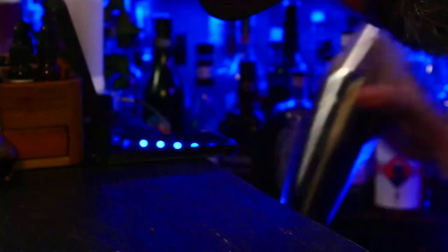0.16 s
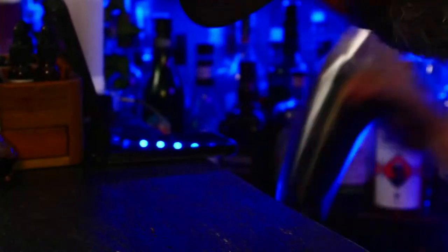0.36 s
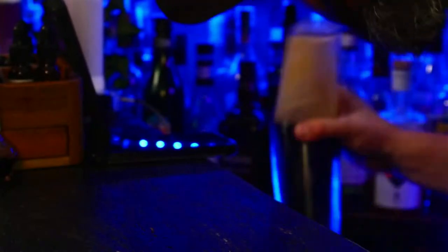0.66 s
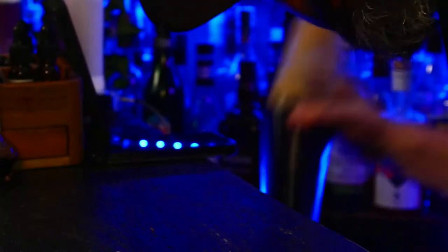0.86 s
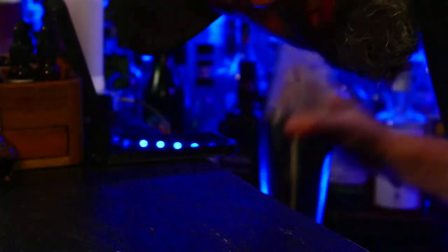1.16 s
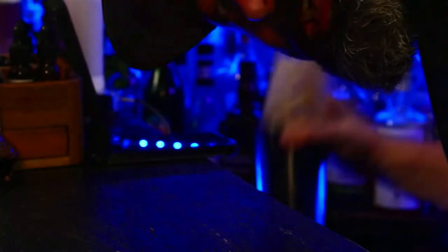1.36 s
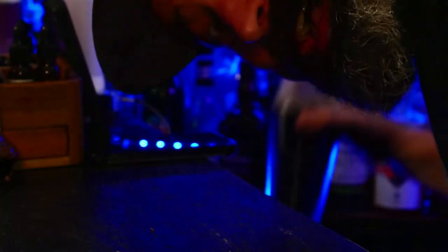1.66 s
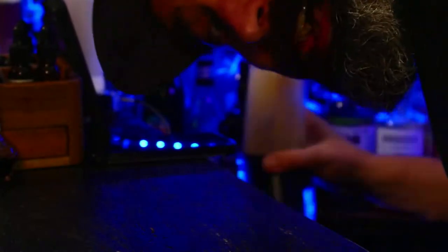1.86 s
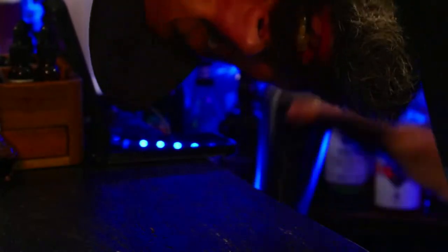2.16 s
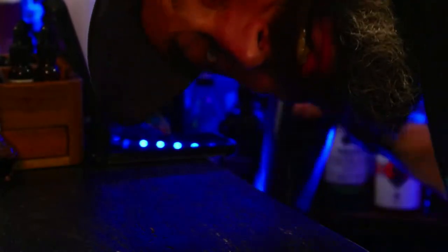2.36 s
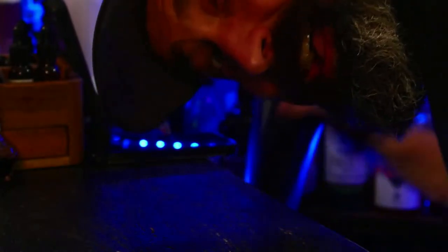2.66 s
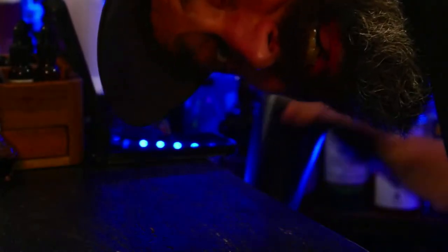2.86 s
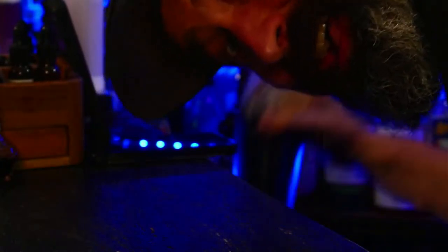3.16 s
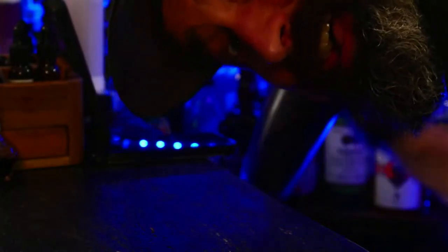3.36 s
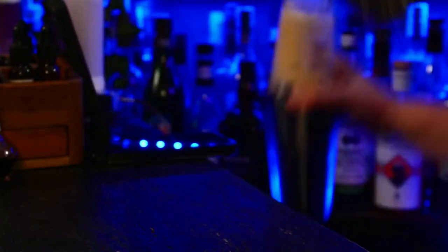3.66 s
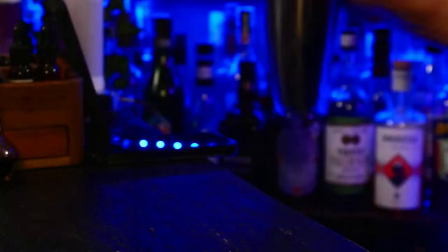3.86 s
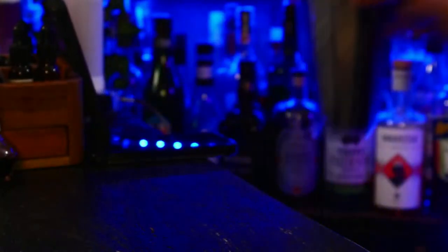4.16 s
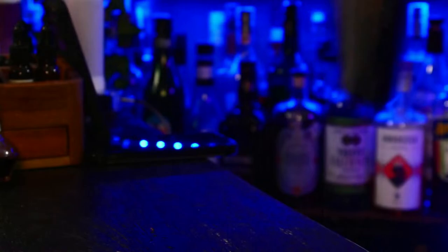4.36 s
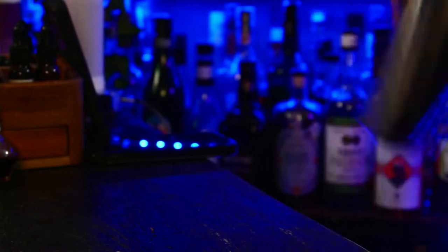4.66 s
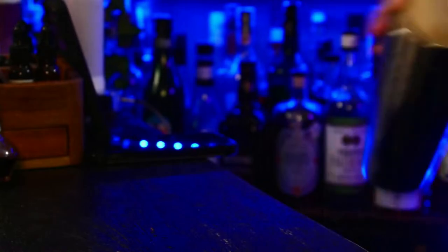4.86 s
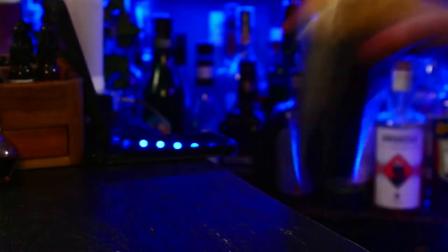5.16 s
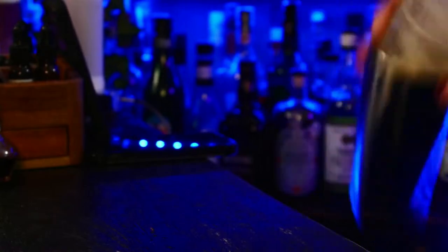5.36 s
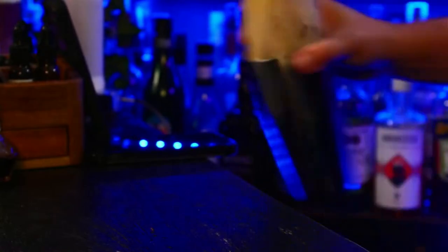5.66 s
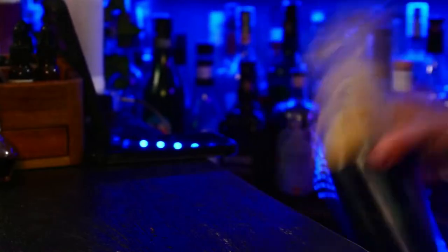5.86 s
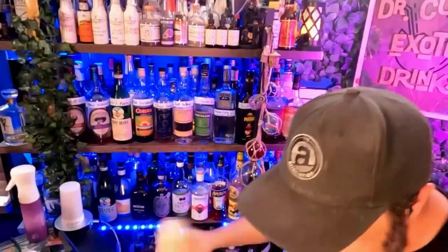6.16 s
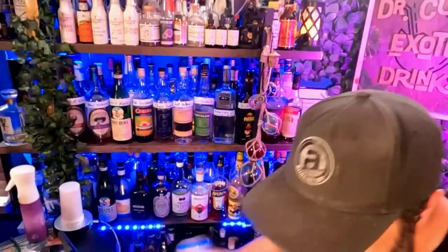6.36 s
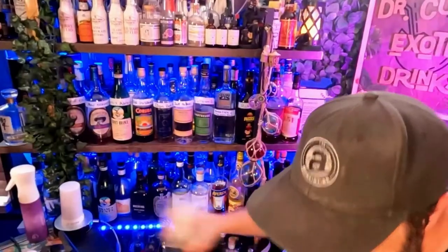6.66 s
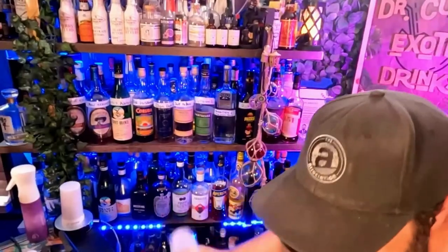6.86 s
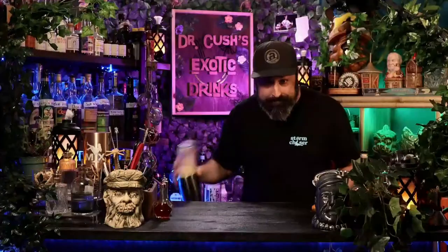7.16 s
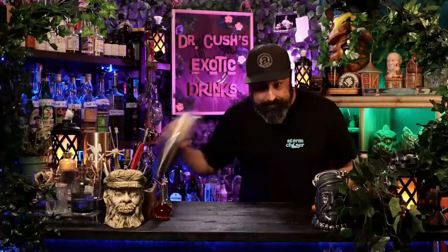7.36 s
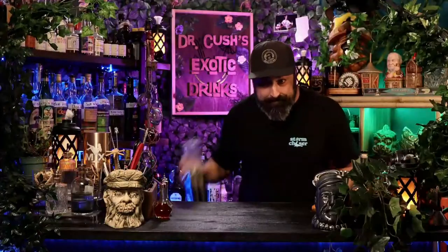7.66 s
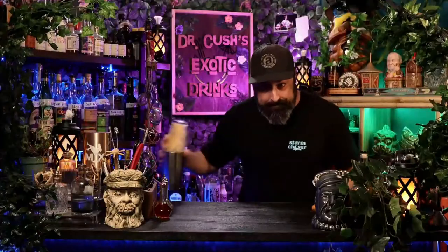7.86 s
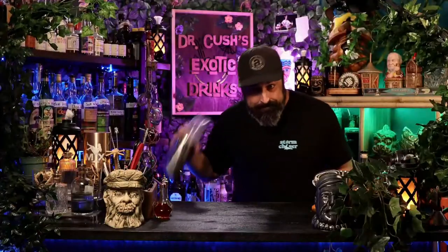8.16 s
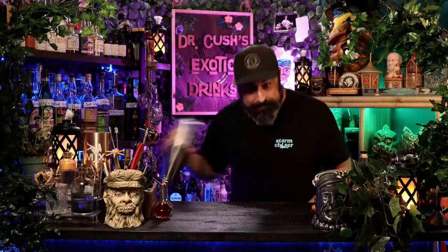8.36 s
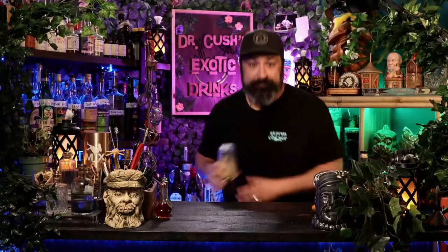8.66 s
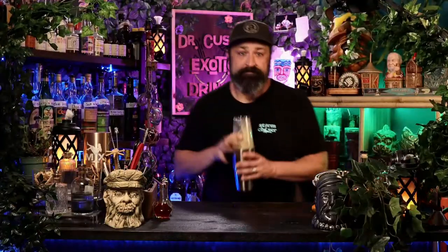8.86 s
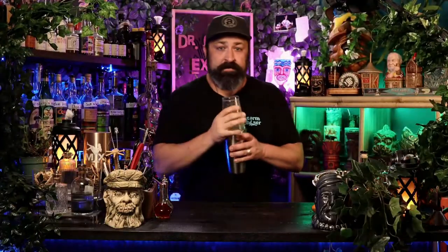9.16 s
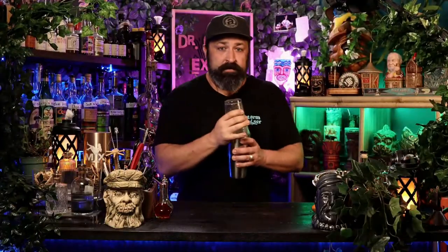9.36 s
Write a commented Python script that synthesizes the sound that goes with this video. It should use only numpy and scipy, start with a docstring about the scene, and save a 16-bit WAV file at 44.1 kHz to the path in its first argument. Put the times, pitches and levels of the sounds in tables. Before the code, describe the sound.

A cocktail shaker full of ice is shaken in a small room, crunchy metallic knocks getting louder until they stop and a palm smacks the tin.

```python
"""A small cluttered bar room: ice cubes are thrown up and down in a hand-held steel and glass cocktail shaker.
Each knock is a lead cube and a swarm of followers, noise bursts ringing the hand-damped walls.
The moving drink gulps in sagging sine tones; a palm slap, a filtered noise burst, comes near the end.
Dense echoes surround it all, and a noise suppressor pulls the tails into near silence between strokes."""
import sys
import numpy as np
from scipy import signal
from scipy.fft import rfft, irfft
from scipy.io import wavfile
from scipy.ndimage import uniform_filter1d

SR = 44100
rng = np.random.default_rng(int(sys.argv[2]) if len(sys.argv) > 2 else 0)


def volts_from_decibels(level):
    """Turn decibel levels (scalar or array-like) into linear amplitude factors."""
    exponent = np.asarray(level, float) / 20
    return 10 ** exponent


def wav_out(sig):
    """Save sig, one row per channel (or a flat mono array), as 16-bit PCM at SR to the path in sys.argv[1]."""
    wavfile.write(sys.argv[1], SR, np.round(np.clip(np.atleast_2d(sig).T, -1, 1) * 32767).astype(np.int16))


N = 419391
BLOCK = 8192  # samples in one knock
LEAD_IN_S = .003  # time in a knock before its lead blow


def room(x, low_t60_s=0.33, high_t60_s=0.28, split_hz=330.0, gap_s=0.008, wet_db=-16.0):
    """Diffuse reverberation: dense echoes decay exponentially, the treble dying first."""
    t = np.arange(2 * BLOCK) / SR
    noise = rng.standard_normal(2 * BLOCK) * (1 - np.exp(-(t / gap_s) ** 2))
    low = signal.sosfilt(signal.butter(1, split_hz, fs=SR, output="sos"), noise)
    echo = low * volts_from_decibels(-60 * t / low_t60_s) + (noise - low) * volts_from_decibels(-60 * t / high_t60_s)
    echo = echo / np.sqrt(np.sum(echo ** 2))
    return x + volts_from_decibels(wet_db) * signal.fftconvolve(x, echo)[:N]


def gulps(rise_s=0.0025, sag_per_s=0.69, rough=.5, longest_s=.4):
    """Cavity resonance: the drink slops over and the air above it hums, sagging in pitch."""
    # hums, before rise and roughness: start_s, level_db, starting pitch_hz, decay_s
    hums = [(.185, -44.5, 622, 0.042), (4.44, -42.5, 334, 0.0056), (4.795, -46, 565, 0.018),
            (5.112, -31.5, 276, 0.022), (6.045, -41.5, 519, 0.052), (6.272, -29.5, 565, 0.012),
            (6.918, -26, 560, 0.016), (6.962, -34.5, 560, 0.014), (7.468, -23.5, 581, 0.0073),
            (8.722, -24, 609, 0.0077)]
    out = 0
    wobble = uniform_filter1d(rng.standard_normal(N), size=200) * np.sqrt(200)
    for start_s, level_db, pitch_hz, decay_s in hums:
        t = np.clip(np.arange(N) / SR - start_s, 0, longest_s)
        tone = np.sin(2 * np.pi * pitch_hz * (t - sag_per_s * t ** 2 / 2))
        envelope = (1 - np.exp(-t / rise_s)) * np.exp(-t / decay_s) * (t < longest_s)
        out = out + volts_from_decibels(level_db) * tone * envelope
    return out * (1 + rough * wobble)


def slap(lead_s=0.0011, tail_s=0.024, tail_db=-9.5, low_hz=280.0, high_hz=9200.0, dull_hz=5200.0):
    """Impact noise: a palm hits the tin to break the seal, a bright smack and a short, duller rattle."""
    # the slap: start_s, peak_db
    start_s, peak_db = (9.1922, -8)
    t = np.clip(np.arange(N) / SR - start_s, 0, None)
    noise = rng.standard_normal(N)
    rattle = signal.sosfilt(signal.butter(1, dull_hz, fs=SR, output="sos"), noise)
    smack = noise * np.exp(-t / lead_s) + volts_from_decibels(tail_db) * rattle * np.exp(-t / tail_s)
    smack = smack * (t > 0)
    smack = signal.sosfilt(signal.butter(1, [low_hz, high_hz], "bandpass", fs=SR, output="sos"), smack)
    return volts_from_decibels(peak_db) * smack / np.abs(smack).max()


def swarm(decay_s, lead_db, rise_s, rate_hz=420., scatter_db=8.0, slosh_db=-7.0, tap_s=0.0013, lead_s=0.00054):
    """Random impact excitation: ice slides in, a lead blow lands, smaller taps and slush die away together."""
    t = np.arange(BLOCK) / SR
    chance = rng.standard_normal((len(decay_s), 2, BLOCK))
    taps = rng.random((len(decay_s), BLOCK)) < rate_hz / SR
    taps = taps * volts_from_decibels(scatter_db * np.tanh(chance[:, 0]))
    taps = signal.lfilter([1], [1, -np.exp(-1 / (tap_s * SR))], taps)
    rise = 1 - np.exp(-(t / rise_s[:, None]) ** 2)
    fade = rise * np.exp(-t / np.clip(decay_s, .003, .07)[:, None])
    after = t - LEAD_IN_S
    lead = volts_from_decibels(lead_db)[:, None] * (after >= 0) * np.exp(-np.abs(after) / lead_s)
    return chance[:, 1] * ((taps + volts_from_decibels(slosh_db)) * fade + lead)


def damped_mode(hz, mode_hz, t60_s):
    """Damped harmonic oscillator: its resonance is the broader the faster it decays."""
    width_hz = np.log(1000) / (np.pi * t60_s)
    scale = np.sqrt(width_hz * mode_hz) * mode_hz
    return scale / (mode_hz ** 2 - hz ** 2 + 1j * hz * width_hz)


def small_modes(hz, count, depth_db=3.3):
    """Causal filter from a folded cepstrum: small wall modes that a blow happens to wake ring on after it."""
    heights = np.tanh(rng.standard_normal((count, 256)))
    ripple = np.array([np.interp(hz, np.arange(256) * 90., row) for row in heights])
    cepstrum = irfft(np.log(volts_from_decibels(depth_db)) * ripple)
    cepstrum[:, BLOCK // 2:] = 0
    return np.exp(2 * rfft(cepstrum))


def body(hz, hollow_hz, hollow_db=-5.5, hollow_t60_s=0.04, share_db=-16.0, lumps_db=4.0, lump_octaves=0.2497):
    """Modal superposition: bare crack plus air and wall modes, struck at a new spot every time."""
    # walls damped by hands and drink: mean pitch_hz, relative level_db, t60_s
    walls = [(274.5, 8, 0.25), (560, 2.5, 0.25), (2287, 5, 0.048), (3364, 8, 0.014), (4296, -5, 0.0052),
             (5047, 7.5, 0.0077), (6795, 5, 0.004)]
    # spectrum of the bare crack of ice on metal: pitch_hz, level_db (per Hz)
    bare_crack = [(60, -25), (256, -12), (950, -3), (1420, -8), (1900, -4), (4420, -2.5), (7400, -12.5),
                  (10000, -19.5), (12700, -29), (16000, -36)]
    count = len(hollow_hz)
    # the air left over the drink changes its pitch as the load moves
    response = 1 + volts_from_decibels(hollow_db) * damped_mode(hz, hollow_hz[:, None], hollow_t60_s)
    scatter_db, detune_share = 5.5, .05
    for wall_hz, level_db, t60_s in walls:
        chance = rng.standard_normal((count, 2)).T[:, :, None]
        mode_hz = wall_hz * (1 + detune_share * chance[0])  # grip and drink detune the walls
        gain = volts_from_decibels(level_db + share_db + scatter_db * np.tanh(chance[1]))
        response = response + gain * damped_mode(hz, mode_hz, t60_s)
    # every cube has its own shape, so its own humps and dips
    place = np.log2(1 + hz / 100) / lump_octaves
    lumps = rng.standard_normal((count, 128))
    lumps = np.array([np.interp(place, np.arange(128), row) for row in lumps])
    response = response * small_modes(hz, count)
    crack_hz, crack_db = np.array(bare_crack).T
    return response * volts_from_decibels(np.interp(np.log(hz), np.log(crack_hz), crack_db) + lumps_db * lumps)


def tin_ring(hz, count, scatter_share=.025):
    """Split modal pair: two close resonances of the steel cup beat together."""
    # strongest ring of the cup: mean pitch_hz, t60_s, half_spacing (share of the pitch)
    mean_hz, t60_s, half_spacing = (1760, 0.051, 0.027)
    tin_hz = mean_hz * (1 + scatter_share * rng.standard_normal((count, 1)))  # the grip detunes the cup
    pair = sum(damped_mode(hz, tin_hz * (1 + side * half_spacing), t60_s) for side in (-1, 1))
    # so small a wall radiates little below its ring
    return pair * (hz / tin_hz).clip(0, 1) ** 2


def cube_shares(hz, count):
    """Incoherent sources: dull, middling and bright cubes tap at different moments, each in its own band."""
    def below(edge_hz):
        scattered_hz = edge_hz * 2 ** (.2 * rng.standard_normal((count, 1)))
        return 1 / (1 + (hz / scattered_hz) ** 8)
    dull, middling = below(2700), below(3900)
    return dull, (1 - dull) * middling, (1 - dull) * (1 - middling)


def hollow_pitch(weight_db, usual_thud_db=-19, middle_hz=680, octaves_per_db=-.035, scatter_octaves=.2):
    """Load-dependent resonance: a load on the cushioned base thuds low, cubes on the bare wall sound higher."""
    heavy_db = (weight_db - usual_thud_db).clip(-16, 14)
    octaves = octaves_per_db * heavy_db + scatter_octaves * rng.standard_normal(len(weight_db))
    return (middle_hz * 2 ** octaves).clip(250, 1250)


def ring_levels(blow_s, crack_db, usual_db=-21, scatter_db=5.5):
    """Variable modal coupling: the cup rings by chance, or as listed when a throw catches bare steel."""
    # throws that set the cup ringing, each given to the nearest knock: time_s, peak_db
    clangs = [(0.3564, -33.5), (0.5791, -25), (0.6295, -24.5), (1.2516, -25), (1.3623, -28),
              (1.9724, -25.5), (2.6439, -25.5), (3.3234, -23.5), (3.5174, -29), (3.9928, -13.5),
              (4.2018, -20), (4.3824, -22), (4.4179, -17.5), (5.2904, -22), (5.7793, -24.5), (6.2687, -29),
              (7.1252, -29), (8.4088, -19), (9.1167, -47)]
    ring_db = crack_db + usual_db + scatter_db * rng.standard_normal(len(blow_s))
    for time_s, peak_db in clangs:
        ring_db[np.abs(blow_s - time_s).argmin()] = peak_db
    return ring_db


def shaker(window_s=0.0063, lead_db=17.5, harder=0.5, rise_s=0.00093, softer=0.34):
    """Source-filter principle: swarms of ice drive thud, tin ring, crack and sparkle at their own strengths."""
    # knocks: blow_s, crack_peak_db, thud_over_crack_db, base decay_s of the swarm
    knock_list = [(0.0014, -24.5, -10.5, 0.017), (0.138, -49.5, -19, 0.081), (0.1692, -26, -18, 0.028),
                  (0.3032, -43.5, -17, 0.029), (0.359, -32, -21, 0.032), (0.432, -39, -10, 0.044),
                  (0.4594, -23, -15, 0.027), (0.5438, -38, -50, 0.084), (0.5792, -17, -34, 0.024),
                  (0.632, -20, -35, 0.044), (0.6739, -30, -23.5, 0.011), (0.6863, -27.5, -6, 0.016),
                  (0.802, -42.5, -23.5, 0.019), (0.83, -33, -38, 0.027), (0.8787, -25.5, -25, 0.047),
                  (0.9109, -20, -21, 0.033), (1.071, -41.5, -19, 0.091), (1.127, -28.5, -5.5, 0.023),
                  (1.2248, -21.5, -46, 0.031), (1.2492, -19.5, -26, 0.026), (1.2891, -21, -29.5, 0.055),
                  (1.325, -28.5, -19.5, 0.024), (1.3614, -16.5, -18.5, 0.027), (1.545, -36, -22, 0.038),
                  (1.5833, -21, -24, 0.025), (1.7698, -43, -19, 0.081), (1.8137, -23, -19.5, 0.017),
                  (1.926, -32.5, -32.5, 0.026), (1.9717, -22, -29.5, 0.034), (2.03, -27.5, -17, 0.018),
                  (2.0658, -9, -27, 0.035), (2.2418, -28.5, -25, 0.016), (2.2678, -20, -24, 0.022),
                  (2.4419, -39.5, -17, 0.089), (2.4888, -25, -15, 0.04), (2.615, -31.5, -34, 0.057),
                  (2.6435, -21, -31, 0.046), (2.7358, -28, -25, 0.008), (2.7505, -17.5, -18, 0.021),
                  (2.7633, -24.5, -13, 0.012), (2.813, -36.5, -4, 0.013), (2.912, -32, -16.5, 0.056),
                  (2.9448, -19.5, -18, 0.017), (3.046, -35.5, -25, 0.027), (3.085, -28, -30, 0.028),
                  (3.0983, -22, -23, 0.013), (3.12, -22, -23.5, 0.028), (3.1697, -21.5, -17, 0.014),
                  (3.181, -24, -9, 0.014), (3.2772, -20, -40, 0.027), (3.3127, -25.5, -30, 0.011),
                  (3.3244, -13.5, -29, 0.013), (3.351, -13, -32, 0.025), (3.4102, -16, -20, 0.024),
                  (3.5186, -19, -25, 0.049), (3.569, -14.5, -21, 0.059), (3.6397, -20, -17, 0.014),
                  (3.81, -18.5, -20.5, 0.049), (3.8206, -12.5, -18.5, 0.031), (3.933, -27.5, -18.5, 0.019),
                  (3.9925, -11, -33.5, 0.027), (4.1102, -15, -15.5, 0.025), (4.142, -20.5, -17, 0.0094),
                  (4.2017, -16, -28.5, 0.0091), (4.235, -17, -22.5, 0.012), (4.249, -17.5, -21, 0.0083),
                  (4.274, -18.5, -14.5, 0.026), (4.288, -16.5, -22, 0.011), (4.3222, -21.5, -18, 0.0082),
                  (4.3813, -14, -18.5, 0.0054), (4.4168, -12.5, -22.5, 0.022), (4.46, -27.5, -20, 0.02),
                  (4.546, -6.5, -21.5, 0.031), (4.5753, -20.5, -14.5, 0.004), (4.6113, -14, -17, 0.02),
                  (4.6839, -26.5, -9, 0.032), (4.848, -21.5, -21.5, 0.0061), (4.8775, 2.5, -39, 0.04),
                  (5.007, -18, -17, 0.021), (5.073, -19, -20, 0.053), (5.107, -30.5, -10.5, 0.018),
                  (5.1502, -25.5, -16, 0.007), (5.2926, -35, -18.5, 0.036), (5.3044, -25.5, -29, 0.0084),
                  (5.3143, -10.5, -30.5, 0.028), (5.446, -6, -26, 0.024), (5.5036, -21.5, -24, 0.038),
                  (5.5572, -19, -19.5, 0.035), (5.603, -16.5, -15.5, 0.041), (5.7798, -27, -23, 0.041),
                  (5.81, -23.5, -22, 0.026), (5.88, -5, -26, 0.019), (5.9891, -27, -20.5, 0.018),
                  (6.0362, -26.5, -11.5, 0.042), (6.098, -22, -24.5, 0.026), (6.132, -20.5, -22.5, 0.03),
                  (6.196, -14.5, -22.5, 0.0163), (6.2115, -18.5, -19.5, 0.034), (6.2694, -18, -20, 0.016),
                  (6.3079, -4.5, -25, 0.026), (6.395, -23.5, -19.5, 0.029), (6.4517, -24, -10.5, 0.041),
                  (6.555, -30, -16, 0.031), (6.6084, -23, -14.5, 0.019), (6.6603, -27.5, -14, 0.016),
                  (6.7539, -15.5, -24, 0.026), (6.896, -39, -21.5, 0.073), (6.9274, -20, -29, 0.023),
                  (7.0345, -20.5, -17.5, 0.025), (7.07, -28, -39, 0.023), (7.124, -34, -31, 0.02),
                  (7.2, -8.5, -24, 0.022), (7.3331, -24.5, -21.5, 0.058), (7.37, -20.5, -16.5, 0.0073),
                  (7.47, -23, -14, 0.009), (7.539, -31.5, -23, 0.037), (7.618, -14, -23, 0.025),
                  (7.688, -30, -20.5, 0.023), (7.7499, -24, -16, 0.039), (7.788, -20.5, -19.5, 0.013),
                  (7.9239, -19, -37, 0.017), (7.9506, -15.5, -29.5, 0.027), (7.9697, -19, -27.5, 0.015),
                  (8.077, -17, -25, 0.029), (8.213, -16.5, -22, 0.031), (8.2473, -17, -18, 0.008),
                  (8.2581, -18.5, -21.5, 0.015), (8.3566, -23.5, -41.5, 0.032), (8.3755, -22, -29.5, 0.014),
                  (8.4092, -16, -23.5, 0.024), (8.4189, -18.5, -37.5, 0.041), (8.532, -4, -26.5, 0.00575),
                  (8.537, -10.5, -18, 0.017), (8.5675, -20, -14.5, 0.028), (8.616, -26.5, -14, 0.051),
                  (8.7203, -23.5, -14, 0.022), (8.8726, -23, -19, 0.047), (8.9673, -41.5, -10.5, 0.016),
                  (9.1164, -57, -7, 0.034), (9.3874, -56, -7, 0.11), (9.5018, -33, -26, 0.013)]
    # treble as the shaker turns and moves: time_s, sparkle_over_crack_db,
    # crack_tilt_db_per_octave, sparkle_tilt_db_per_octave
    turns = [(0, -22, 2, -6.5), (2, -25.5, 4, -2), (3.8, -25.5, 2, 1.5), (4.499, -24, -3, 2.5),
             (5.5, -31, -1.5, 8.5), (6.3, -29, 0, 3), (7.3, -22.5, 0.5, 1), (8.501, -21, 1, 0)]
    # borders of thud, crack and sparkle: pitch_hz
    edges_hz = [1300, 7500]
    # swarms of thud, tin ring, crack, sparkle: decay_factor, rise_factor, added lead_blow_db
    parts = [(0.98, 1.63, -7), (1, 0.36, -2.5), (0.85, 0.65, 5), (1, 1.2, 8.5)]
    blow_s, crack_db, weight_db, decay_s = np.transpose(knock_list)
    count = len(blow_s)
    turn_s, *treble = np.transpose(turns)
    over_db, crack_tilt, sparkle_tilt = (np.interp(blow_s, turn_s, column) for column in treble)
    thud_db, sparkle_db = crack_db + weight_db, crack_db + over_db
    ring_db = ring_levels(blow_s, crack_db)

    hz = np.arange(BLOCK // 2 + 1) * SR / BLOCK + 1e-3
    response = body(hz, hollow_pitch(weight_db))
    low_hz, high_hz = edges_hz
    thud, crack, sparkle = (
        response * signal.sosfreqz(signal.butter(2, edge, kind, fs=SR, output="sos"), hz, fs=SR)[1]
        for edge, kind in [(low_hz, "lowpass"), (edges_hz, "bandpass"), (high_hz, "highpass")])
    crack = crack * volts_from_decibels(crack_tilt[:, None] * np.log2(hz.clip(low_hz, high_hz) / low_hz))
    sparkle = sparkle * volts_from_decibels(sparkle_tilt[:, None] * np.log2(hz.clip(high_hz) / high_hz))

    shapes = [thud, tin_ring(hz, count), crack, sparkle]
    levels = [thud_db, ring_db, crack_db, sparkle_db]
    by_peak = [False, True, True, False]  # the others are levelled by their early rms
    shares = cube_shares(hz, count)
    early = np.exp(-np.arange(BLOCK) / SR / window_s)
    # hard throws land as one lump, so they rise faster and their lead blow stands out more
    force_db = crack_db.clip(-36)
    knocks = 0
    for shape, level_db, peak, (longer, slower, blow_db) in zip(shapes, levels, by_peak, parts):
        part_lead_db = lead_db + blow_db + harder * force_db
        part_rise_s = slower * rise_s * volts_from_decibels(-softer * force_db)
        drive = sum(np.sqrt(share) * rfft(swarm(longer * decay_s, part_lead_db, part_rise_s))
                    for share in shares)
        band = irfft(shape * drive)
        size = np.abs(band).max(1) if peak else np.sqrt(band ** 2 @ early / early.sum())
        knocks = knocks + band * (volts_from_decibels(level_db) / size)[:, None]
    knocks = knocks * np.hanning(2 * BLOCK)[BLOCK:] ** .5
    out = np.zeros(N + BLOCK)
    starts = np.maximum((blow_s - LEAD_IN_S) * SR, 0).astype(int)
    for start, knock in zip(starts, knocks):
        out[start:start + BLOCK] += knock
    return out[:N]


def scene():
    """Linear superposition: drink, slap and shaker add up and share one room."""
    return room(gulps() + slap() + shaker())[None]


def low_pass(x):
    """Removes everything above the highest recorded frequency."""
    return signal.sosfilt(signal.butter(12, 16540, fs=SR, output="sos"), x)


def record(dry):
    """Spectral expansion and soft saturation: quiet bands sink, bass and top are cut, peaks are rounded."""
    knee_db, slope, ceiling = -78., .7, 1.1  # slope: dB of cut per dB under the knee
    cells = signal.stft(dry, nperseg=1024, noverlap=768)[2]
    power = uniform_filter1d(np.abs(cells) ** 2, size=9, axis=1)
    power = uniform_filter1d(power, size=2, axis=2)
    whole = power.mean(1, keepdims=True)
    # each narrow band is judged half by its own level, half by that of the whole spectrum
    level_db = 10 * np.log10(np.sqrt(power.clip(1e-16) * whole.clip(1e-16)))
    gain = volts_from_decibels(slope * np.minimum(level_db - knee_db, 0))
    quiet = signal.istft(cells * gain, nperseg=1024, noverlap=768)[1][:, :N]
    quiet = signal.sosfilt(signal.butter(2, 75., "highpass", fs=SR, output="sos"), quiet)
    quiet = signal.sosfilt(signal.butter(8, 15800., fs=SR, output="sos"), quiet)
    return low_pass(ceiling * np.tanh(quiet / ceiling))


dry = scene()
out = record(dry)
wav_out(out)
```